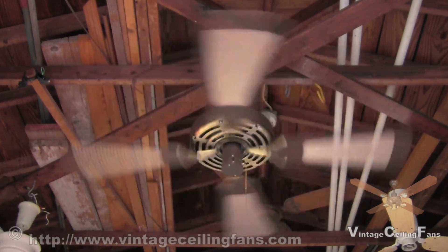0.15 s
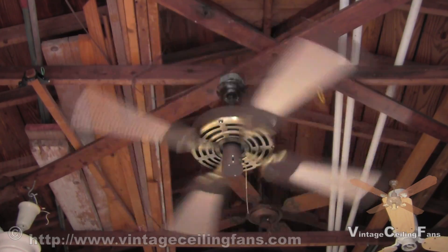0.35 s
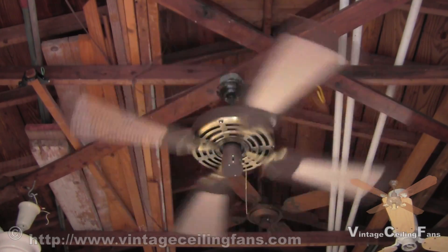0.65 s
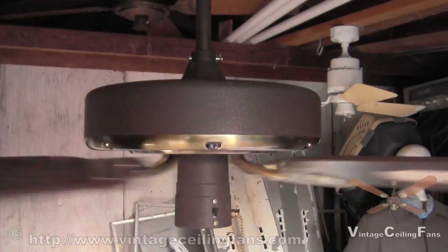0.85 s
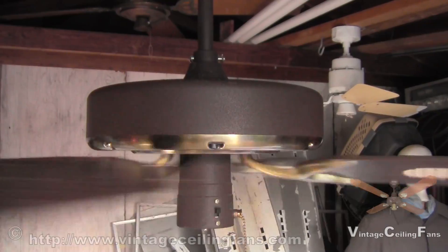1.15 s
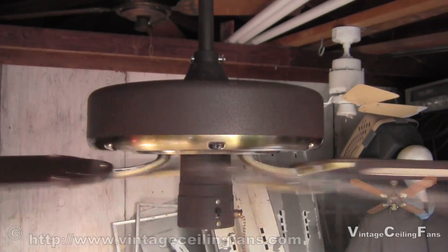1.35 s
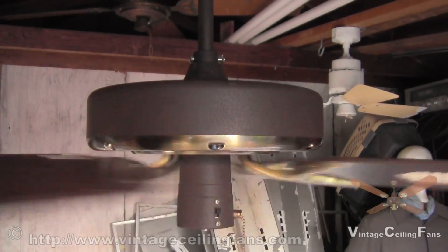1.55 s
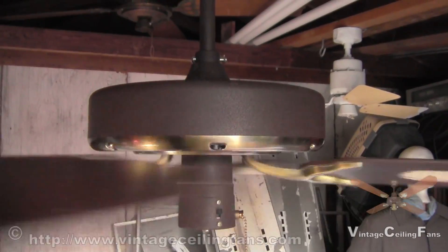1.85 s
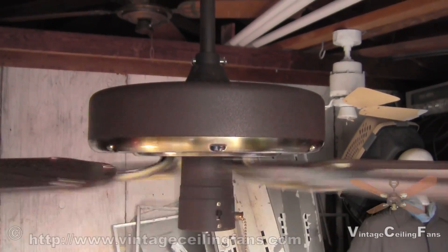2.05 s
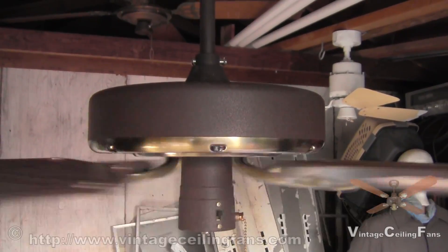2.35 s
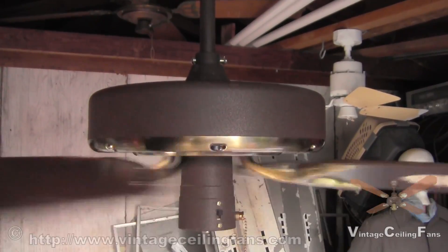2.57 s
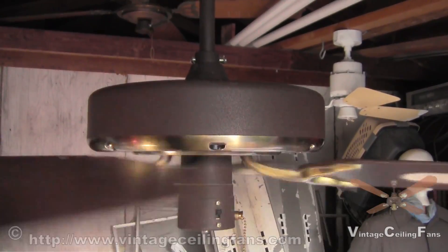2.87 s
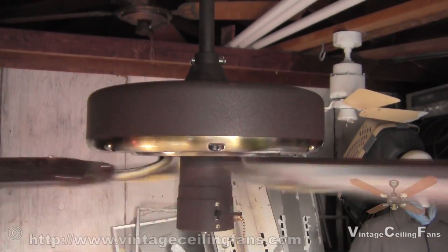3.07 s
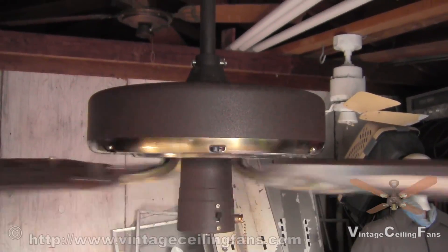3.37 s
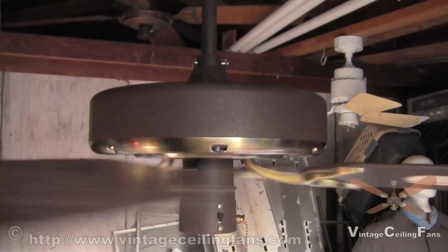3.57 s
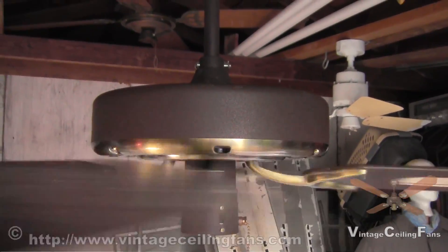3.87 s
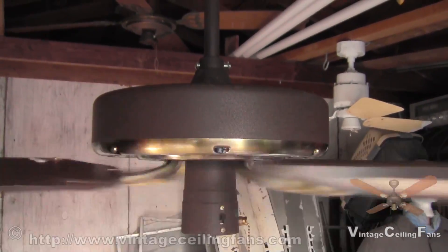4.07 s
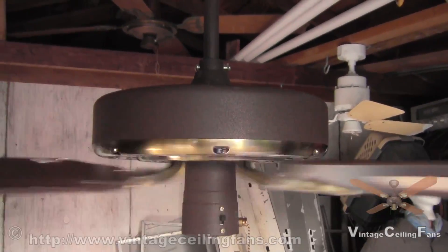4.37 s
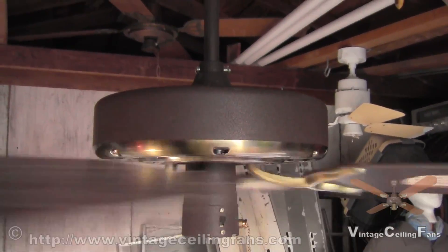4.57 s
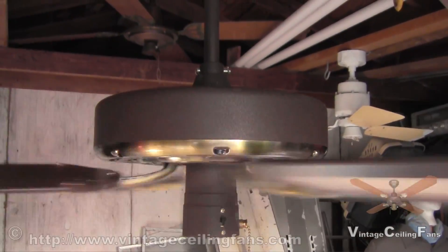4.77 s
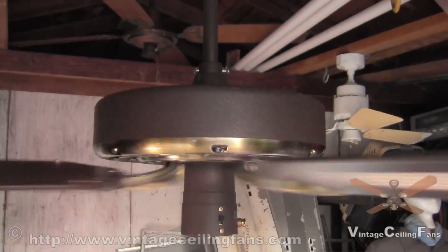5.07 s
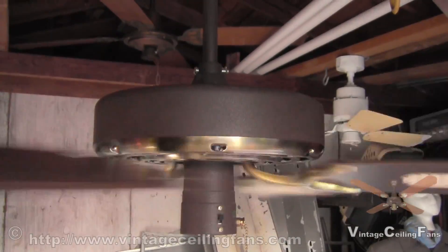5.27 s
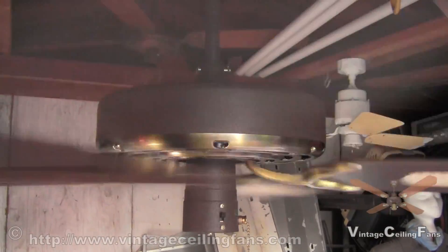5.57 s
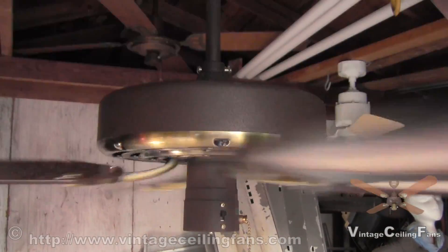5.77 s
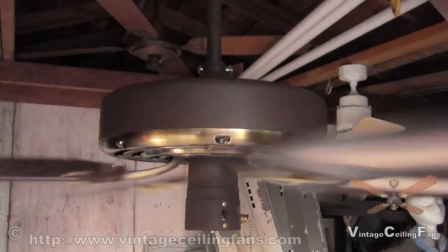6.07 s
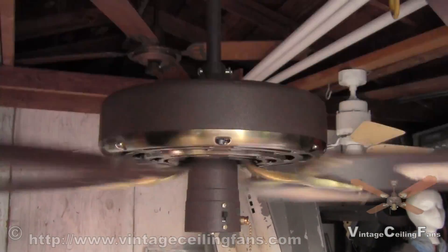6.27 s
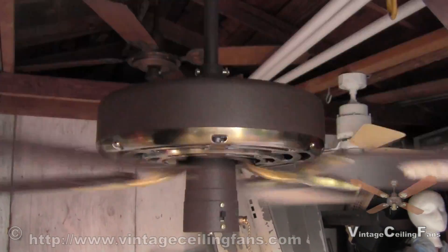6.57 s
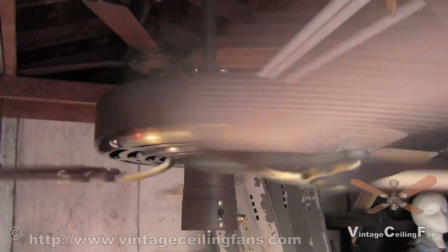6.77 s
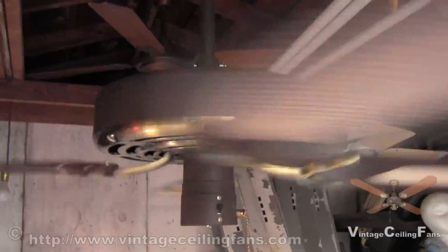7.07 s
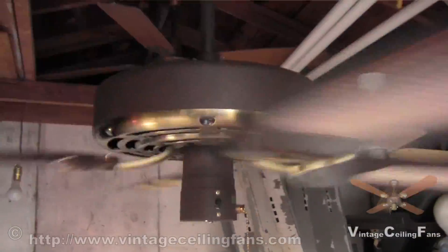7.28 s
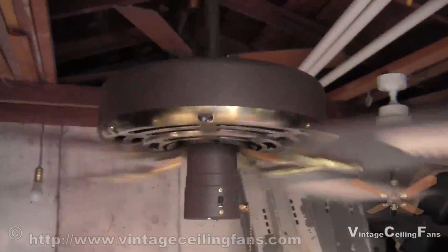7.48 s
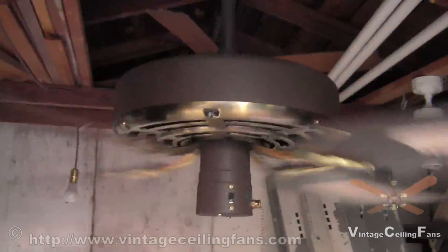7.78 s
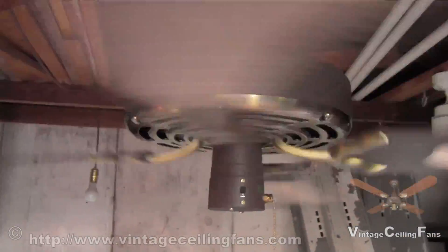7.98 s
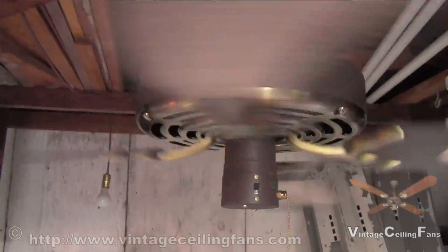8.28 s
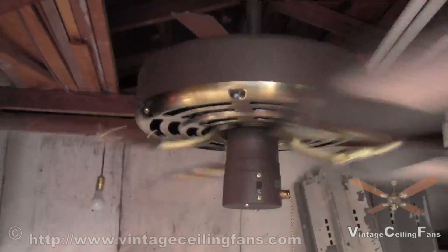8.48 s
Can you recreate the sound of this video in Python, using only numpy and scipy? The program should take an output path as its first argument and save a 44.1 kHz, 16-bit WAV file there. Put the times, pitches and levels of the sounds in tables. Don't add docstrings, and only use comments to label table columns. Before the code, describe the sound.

A ceiling fan rushes steadily indoors, then its blades thump past the microphone in fast, heavy, crackling wind buffets before easing back to soft whooshing and hum.

```python
import sys
import numpy as np
from scipy import signal
from scipy.fft import rfft, irfft, next_fast_len
from scipy.io import wavfile
from scipy.ndimage import uniform_filter1d

SR = 44100
rng = np.random.default_rng(int(sys.argv[2]) if len(sys.argv) > 2 else 0)


def inscribe(sig):
    pcm = np.round(np.clip(np.atleast_2d(sig).T, -1, 1) * 32767)
    wavfile.write(sys.argv[1], SR, pcm.astype(np.int16))


def convert_level_to_amplitude(level_db):
    exponent = np.asarray(level_db, float) / 20
    return 10 ** exponent


N = 380583
M = next_fast_len(N)
HZ = np.fft.rfftfreq(M, 1 / SR)

# (t/s, distance out of the plane 0-1)
SINK = [
    (4.6, 0.18),
    (5.6, 0.47),
    (6.6, 0.7),
    (7.4, 0.68),
]


def evened(x):
    return x / np.sqrt(np.mean(x ** 2) + 1e-20)


def read(points, hz):
    f, value = np.transpose(points)
    return np.interp(np.log(hz + 1), np.log(f + 1), value)


def add(mix, s, sound):
    part = mix[..., round(s * SR):][..., :sound.shape[-1]]
    part += sound[..., :part.shape[-1]]


def sunk(s):
    return np.clip(np.interp(s, *np.transpose(SINK)), 0, 1)


def coloured(x, points, lo_hz, hi_hz):
    z = rfft(x, M) * convert_level_to_amplitude(read(points, HZ))
    band = (HZ > lo_hz) & (HZ < hi_hz)
    power = (abs(z[..., band]) ** 2).sum(-1).mean()
    return irfft(z, M)[..., :N] * M / np.sqrt(2 * power)


def pair():
    # (f/Hz, left-right likeness 0-1)
    likeness = [(60, 0.99), (180, 0.94), (550, 0.91), (1650, 0.92), (4970, 0.76), (15000, 0.13)]
    a, b = rfft(rng.standard_normal((2, M)))
    same = np.clip(read(likeness, HZ), 0, 1)
    return irfft(np.array([a, same * a + np.sqrt(1 - same ** 2) * b]), M)[:, :N]


def lumps(ms, depth_db):
    size = round(ms * SR / 1000)
    wander = uniform_filter1d(uniform_filter1d(rng.standard_normal(N), size), size)
    return evened(convert_level_to_amplitude(depth_db * evened(wander)))


def passes():
    # (low blade passes t/s, push level/dB, its wake level/dB, other blades' wake level/dB)
    turns = [(0.633, -39, -60, -45.5), (0.9506, -13.5, -12.5, -16.5), (1.2656, -18, -14.5, -17),
             (1.5818, -13, -7, -25), (1.8966, -15, -17, -22), (2.2089, -16, -14.5, -20),
             (2.5235, -14, -7.5, -22.5), (2.838, -14.5, -9, -21), (3.147, -14, -9.5, -20),
             (3.458, -14.5, -6.5, -18.5), (3.7674, -10.5, -7.5, -11), (4.0774, -15, -9, -13.5),
             (4.384, -18.5, -9.5, -12), (4.6928, -16, -16, -21), (5.003, -21, -16.5, -24),
             (5.306, -28, -28.5, -32), (5.6144, -30.5, -30, -36), (5.922, -34, -38.5, -34.5),
             (6.226, -35, -30, -30), (6.532, -35.5, -40, -34), (6.8328, -39.5, -33.5, -28.5),
             (7.1351, -41, -41.5, -37.5), (7.435, -44.5, -40, -34), (7.7333, -45.5, -47, -39),
             (8.036, -52, -51, -40), (8.3335, -56, -42, -36), (8.634, -62, -40, -41)]
    # (place as share of a turn, push level/dB, wake level/dB, swish level/dB)
    blades = [
        (0, 0.32, 0, 2.5),
        (0.251, 1, 4, 1.1),
        (0.494, 0.5, -2, 1.1),
        (0.751, -0.87, -0.5, -0.3),
    ]
    # (t/s, extra trail/ms)
    trail = [
        (3.6, 0.098),
        (4.2, 2.7),
        (4.9, 5.4),
        (5.5, 0.3),
    ]
    turn_s, turn_push_db, low_db, others_db = np.transpose(turns)
    count = len(blades)
    columns = [np.tile(c, len(turns) - 1) for c in np.transpose(blades)]
    place, blade_push_db, blade_wake_db, blade_swish_db = columns
    s = np.repeat(turn_s[:-1], count) + place * np.repeat(np.diff(turn_s), count)
    far = sunk(s)
    a, b, c, d, e = rng.standard_normal((len(s), 5)).T
    scatter_db, scatter_ms = 1.5, 1.2

    push_db = np.interp(s, turn_s, turn_push_db) + blade_push_db + scatter_db / 2 * a
    wake_db = np.interp(s, turn_s, others_db) + (1 - far) * blade_wake_db
    wake_db[::count] = low_db[:-1]
    unlike_db = wake_db + 2 - 34 * far + scatter_db * b
    alike_db = wake_db - 5.5 * (1 - far) + scatter_db * c
    fade_in_db = -13.5 * np.clip((0.99 - s) / 0.23, 0, 1)
    swish_db = -53.5 + blade_swish_db + fade_in_db + scatter_db / 2 * d
    centre_ms = 8.17 + 0.25 * (1 - far) * (wake_db - push_db) + np.interp(s, *np.transpose(trail))
    centre_ms = np.clip(centre_ms + scatter_ms * e, 2, 16)
    return np.array([s, push_db, unlike_db, alike_db, swish_db, centre_ms])[:, 1:]


PASS_S, PUSH_DB, UNLIKE_DB, ALIKE_DB, SWISH_DB, WAKE_MS = passes()


def per_pass(levels_db, peak_ms, rise_ms, fall_ms):
    ms = np.arange(-60, 70, 1000 / SR) - peak_ms
    slope = np.where(ms < 0, ms / rise_ms, ms / fall_ms)
    swell = np.exp(-np.sqrt(slope ** 2 + 0.12))
    out = np.zeros(N)
    for s, db in zip(PASS_S, levels_db):
        add(out, s - 0.06, convert_level_to_amplitude(db) * swell)
    return out


def wake_train(levels_db, start_ms, stretch, fade_ms):
    ms = np.arange(-10, 90, 1000 / SR)
    out = np.zeros(N)
    for s, centre_ms, db in zip(PASS_S, WAKE_MS, levels_db):
        onset = 0.5 + 0.5 * np.tanh(ms - start_ms - 0.21 * centre_ms)
        fade = np.exp(-np.maximum(ms - stretch * centre_ms, 0) / fade_ms)
        add(out, s - 0.01, convert_level_to_amplitude(db) * onset * fade)
    return out


def room_air():
    # (f/Hz, level/dB per Hz)
    rush_spectrum = [(15, -42), (25, -21.5), (130, 1.5), (212, -5), (317, -1.5), (405, -7.5), (503, -6.5),
                     (1700, -20.5), (2350, -25), (3340, -28.5), (7920, -41.5), (14800, -57.5),
                     (16000, -79.5)]
    # (t/s, level/dB)
    rush_level = [(0.0, -48), (0.6, -48), (0.98, -53.5), (2.0, -53.5), (2.4, -49), (3.2, -62.5),
                  (3.8, -54.5), (4.52, -44), (5.5, -45.5), (8.63, -45)]
    # (f/Hz, level/dB)
    hum = [(166.9, -58), (312.2, -71.5), (500.6, -62.5), (1007, -69.5), (1200, -71)]
    t = np.arange(N) / SR
    throb_db = 1.2 * np.cos(2 * np.pi * 12.5 * t) * (t < PASS_S[0])
    rush = coloured(pair() * lumps(30, 0.6), rush_spectrum, 280, 6000)
    white = pair()
    # (f/Hz, level/dB, width/Hz)
    peaks = [(hz, db, 14) for hz, db in hum] + [(2317, -69.5, 130)]
    tones = 0
    for hz, db, width_hz in peaks:
        peak = 1 / (1 + (2 * (HZ - hz) / width_hz) ** 2)
        tones = tones + convert_level_to_amplitude(db) * peak / np.sqrt(width_hz * np.pi / 2 / SR)
    level_db = np.interp(t, *np.transpose(rush_level))
    motor = irfft(rfft(white, M) * tones, M)[:, :N]
    return convert_level_to_amplitude(level_db + throb_db) * rush + convert_level_to_amplitude(level_db + 51) * motor


def swish():
    # (f/Hz, level/dB per Hz)
    spectrum = [(88, -38.5), (150, -4.5), (262, -0.5), (343, -4.5), (459, -3.5), (495, -2.5), (787, -10),
                (1870, -22), (2310, -20.5), (2750, -27.5), (4210, -31), (15000, -48.5)]
    flick_db = SWISH_DB + 0.2 * (PUSH_DB + 14) - 0.5
    swell = per_pass(SWISH_DB + 1.0, 2.1, 22, 11.4) + per_pass(flick_db, 0, 2.5, 11.0)
    hiss = coloured(pair() * lumps(4.0, 1.0), spectrum, 1300, 7000)
    dull = signal.sosfilt(signal.butter(1, 5030, fs=SR, output="sos"), hiss)
    far = np.clip(1.8 * sunk(np.arange(N) / SR), 0, 1)
    return ((1 - far) * hiss + far * dull) * swell


def push():
    # (t/s, front edge share, face share, rear edge share, face lag/ms)
    blade = [(1.1, 0.43, -0.53, -0.013, 1.5), (2.0, 1.0, -0.53, -0.05, 5), (2.999, 1, -0.62, 0.11, 5.5),
             (3.7, 0.95, -0.25, 0.13, 3.2), (4.1, 1, -1.4, 0.11, 5.1), (4.6, 0.25, -0.14, -0.47, 3.9),
             (5.1, 0.95, 0.064, -1, 8.9), (5.5, 0.35, 0.79, -0.44, 0.5), (6.5, 1, 0.96, -1, 2.2),
             (7.35, -0.27, 1, -0.18, 1.7), (8.4, -0.15, 1.0, 0.054, 3.9)]
    ms = np.arange(-15, 60, 1000 / SR)
    cut = signal.butter(3, 66.2, "high", fs=SR, output="sos")
    gradient = signal.butter(1, 65, "high", fs=SR, output="sos")
    arrival = 0.5 + 0.5 * np.tanh((ms + 3.3) / 4.2)
    s, *columns = np.transpose(blade)
    out = np.zeros((2, N))
    for when, db, chance in zip(PASS_S, PUSH_DB, rng.standard_normal((len(PASS_S), 2))):
        front, face, rear, lag_ms = (np.interp(when, s, c) for c in columns)
        face = face + 0.07 * chance[0]
        rear = rear + 0.12 * chance[1]
        # (share, centre/ms, width/ms)
        lobes = [(front, 0, 1.545), (face, lag_ms, 6.4), (rear, 10.5, 2.16)]
        pressure = sum(a * np.exp(-0.5 * ((ms - at) / width) ** 2) for a, at, width in lobes)
        wave = evened(signal.sosfilt(cut, pressure)) * np.sqrt(75 / 30)
        pan_db = 1.9 - 2.7 * sunk(when)
        steep = signal.sosfiltfilt(gradient, wave) * np.tanh(pan_db / 4.1)
        add(out, when - 0.015, convert_level_to_amplitude(db) * arrival * np.array([wave + steep, wave - steep]))
    return out


def wake():
    unlike_spectrum = [(24, -63.5), (40, -33), (110, -2), (169, 4), (258, -3.5), (366, -3.5), (869, -36),
                       (1500, -47.5), (1950, -67.5), (3300, -120)]
    near_spectrum = [(30, -8), (60, 11.5), (170, 6.5), (300, -4), (500, -15.5), (900, -31.5), (1600, -39.5),
                     (4000, -60.5), (9000, -89)]
    far_spectrum = [(40, -17.5), (100, -6), (220, 1.5), (400, -3.5), (700, -16.5), (1500, -32.5),
                    (5000, -57.5), (9000, -93.5)]
    grit_spectrum = [(300, -12), (700, 7), (1500, -7.5), (2800, -28.5), (4500, -38), (8000, -59),
                     (15000, -80.5)]
    a, b, c, d = rng.standard_normal((4, N))
    linger = per_pass(UNLIKE_DB - 10, 16, 8, 18) * lumps(8, 3.5)
    patchy = lumps(3, 4)
    gust = wake_train(UNLIKE_DB + 6.0, 0.1, 1.98, 3.1)
    unlike = coloured(a, unlike_spectrum, 130, 800) * (gust + linger)

    far = sunk(np.arange(N) / SR)
    near_part = (1 - far) * coloured(b, near_spectrum, 140, 800)
    far_part = far * coloured(b, far_spectrum, 120, 800)
    alike_gust = wake_train(ALIKE_DB + 5.5, -1.0, 1.6, 2.54)
    alike = (near_part + far_part) * (alike_gust + 1.1 * linger)

    two_ports = np.array([c - 0.11 * d, d - 0.15 * c])
    grit = convert_level_to_amplitude(-37.5) * coloured(two_ports, grit_spectrum, 1500, 7000) * gust * patchy
    sides = np.array([[1.025], [-0.975]])
    return alike + unlike * sides + grit


def cracks():
    # (t/s, peak level/dB, treble over middle/dB, left over right/dB)
    strong = [(1.1062, -44, -19, 11), (1.2776, -24.5, -24, 19), (1.588, -31, -11, 12),
              (1.9016, -29.5, -32, 1), (2.8398, -26.5, -7, 0), (2.8494, -17.5, -30, -14),
              (2.9286, -22.5, -23, -17), (3.1558, -17, -26.5, -20), (3.1677, -28.2, -31, 18),
              (3.4606, -35, 8, 5), (3.4696, -9.5, -23.5, 16), (3.5472, -12.5, -22, -25),
              (3.6924, -28.5, -31, -22), (3.7718, -19.5, -11, 0), (3.856, -10.5, -25, -20),
              (4.0125, -14.5, -20, 11), (4.0893, -22.5, -15, -18), (4.0961, -32, -19, 2),
              (4.1583, -31.5, -11.5, -1), (4.2275, -39, -30, -1), (4.4007, -7, -17, 26),
              (4.4126, -35, -24, 7), (4.477, -18, -23, 11), (4.5442, -25, -26.5, -2),
              (4.637, -29, -34, -21), (4.6989, -36, -17, 2), (4.9317, -31.5, -22, -2),
              (5.355, -36.5, -33.5, 26), (6.6166, -35.5, -22.5, 1), (6.841, -28.5, -24, -0.5)]
    ms = np.arange(-256, 256) * 1000 / SR
    hz = np.fft.rfftfreq(512, 1 / SR) + 1
    middle = (hz > 900) & (hz < 4000)
    out = np.zeros((2, N))
    sides = rng.standard_normal(len(PASS_S))
    faint = [(s + 0.0022, db - 24, -20, 6 * side) for s, db, side in zip(PASS_S, PUSH_DB, sides)]
    bursts = list(strong) + faint
    for (s, db, treble_db, pan_db), noise in zip(bursts, rng.standard_normal((len(bursts), 512))):
        slope_db = (treble_db - 4.0) / 1.94 * np.log2(np.maximum(hz, 450) / 1300)
        z = rfft(noise * np.exp(-0.5 * (ms / 1.2) ** 2)) * convert_level_to_amplitude(slope_db)
        z *= hz ** 2 / (hz ** 2 + 250 ** 2)
        z /= 1 + (hz / 5000) ** 4
        puff = irfft(z) * np.hanning(512) / np.max(abs(irfft(z * middle)))
        share = 1 / (1 + convert_level_to_amplitude(-2 * pan_db))
        ports = np.sqrt([[share], [1 - share]])
        ports = ports - 0.34 * ports[::-1]
        add(out, s - 256 / SR, convert_level_to_amplitude(db + 4.5) * ports * puff)
    return out


def tick():
    t = np.arange(2000) / SR
    bright = signal.butter(3, [3500, 9800], "band", fs=SR, output="sos")
    puff = signal.sosfilt(bright, rng.standard_normal(len(t))) * np.exp(-1000 * t / 6.0)
    out = np.zeros(N)
    add(out, 6.293, convert_level_to_amplitude(-44) * puff)
    return out


def scene():
    return room_air() + swish() + push() + wake() + cracks() + tick()


def low_pass(x):
    return signal.sosfilt(signal.butter(12, 16610, fs=SR, output="sos"), x)


def record(dry):
    dry = dry + convert_level_to_amplitude(-83.5) * rng.standard_normal(dry.shape)
    power = uniform_filter1d((dry ** 2).mean(0), 600, origin=299)
    power_db = 10 * np.log10(abs(power) + 1e-12)
    fall_db = np.arange(N) * 210.0 / SR
    held_db = np.maximum.accumulate(power_db + fall_db) - fall_db
    over_db = np.maximum(held_db + 15.5, 0)
    ducked = dry / convert_level_to_amplitude(0.52 * uniform_filter1d(over_db, 300))
    limited = ducked / (1 + (ducked / 0.82) ** 4) ** 0.25
    mid, side = limited.mean(0), (limited[0] - limited[1]) / 2
    side = signal.sosfiltfilt(signal.butter(2, 75, "high", fs=SR, output="sos"), side)
    top = signal.firwin(601, 15480, window=("kaiser", 8), fs=SR)
    mix = signal.oaconvolve(np.array([mid + side, mid - side]), top[None], "same")
    return low_pass(mix)


dry = scene()
out = record(dry)
inscribe(out)
```